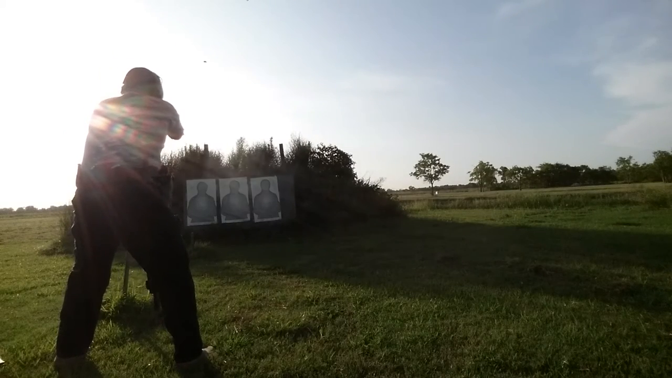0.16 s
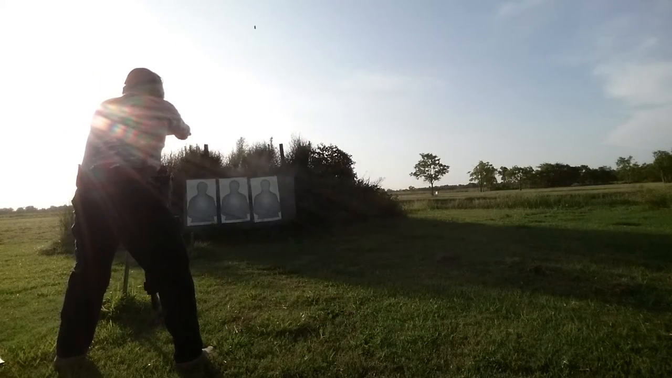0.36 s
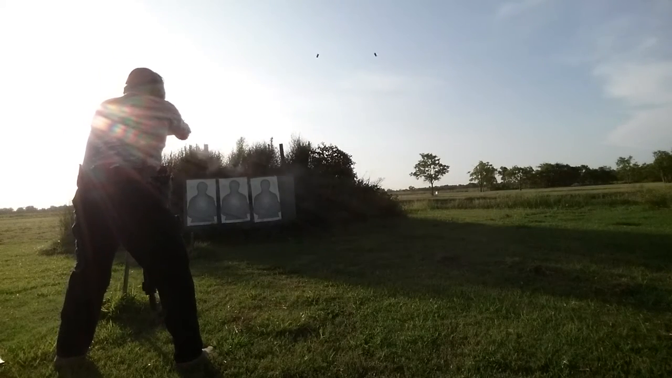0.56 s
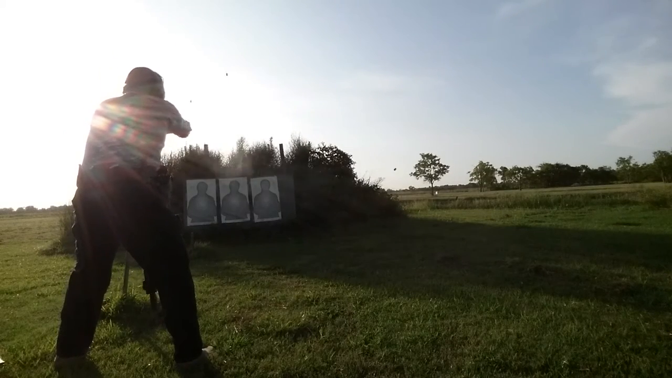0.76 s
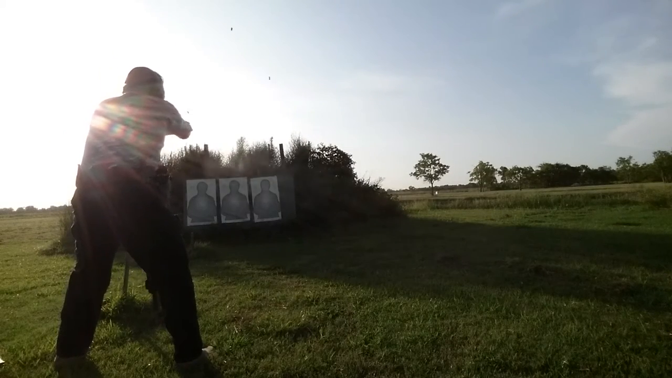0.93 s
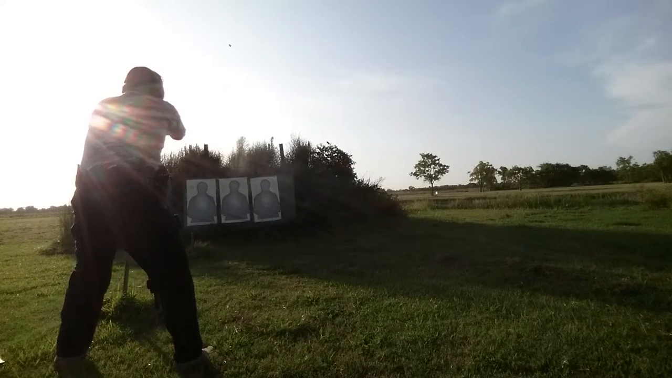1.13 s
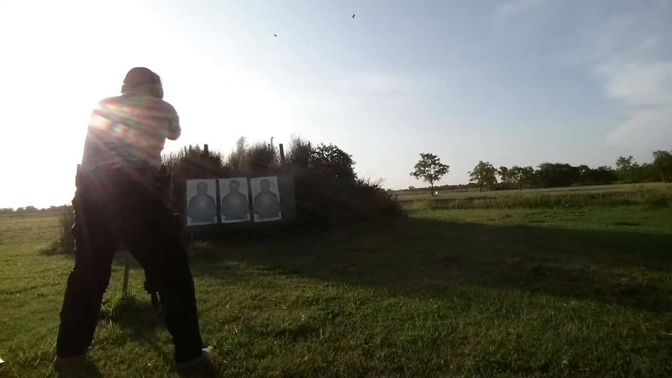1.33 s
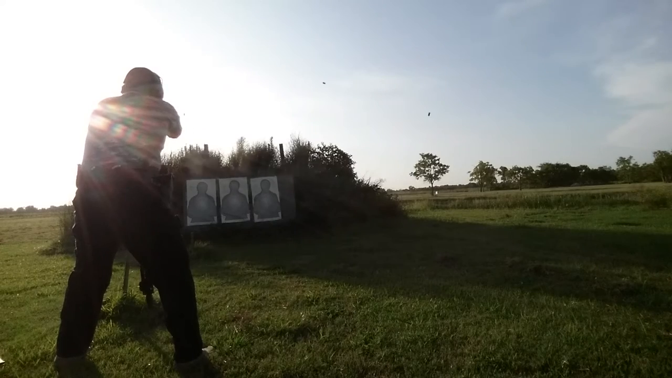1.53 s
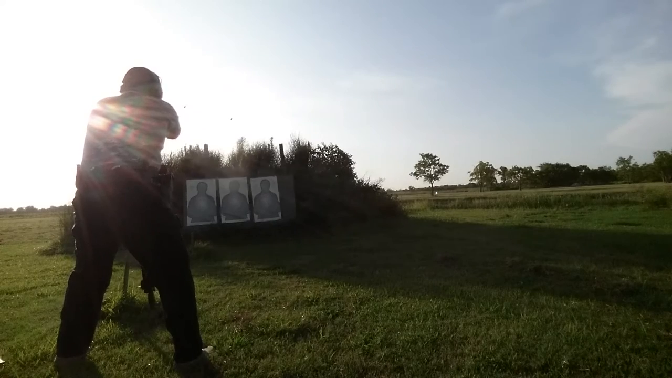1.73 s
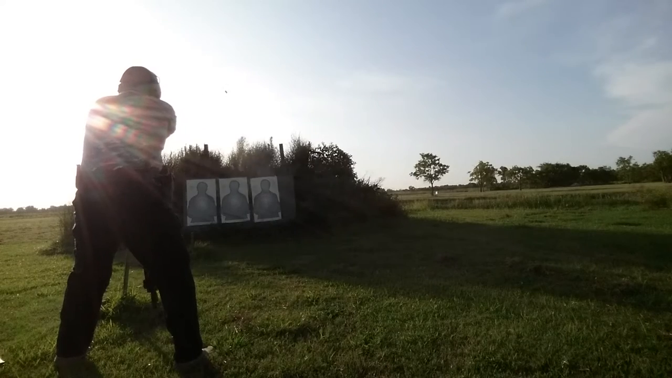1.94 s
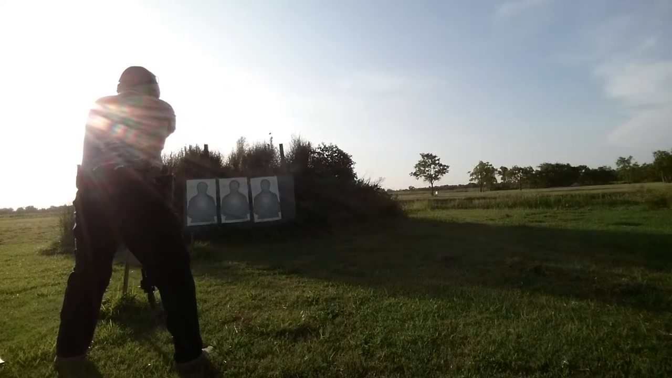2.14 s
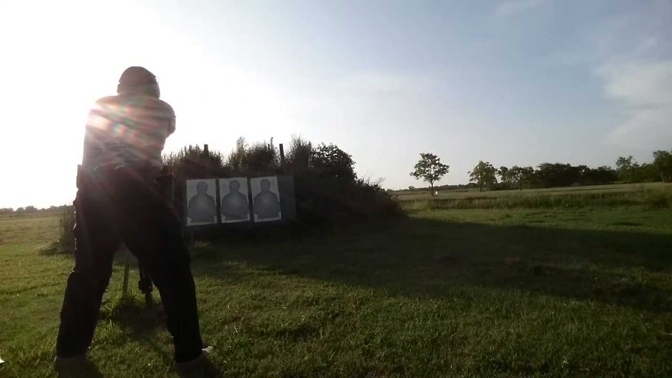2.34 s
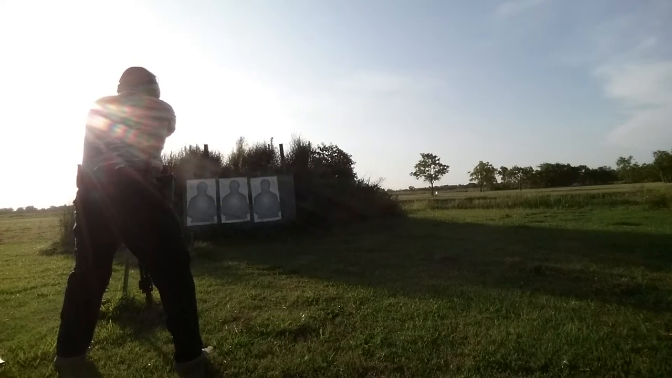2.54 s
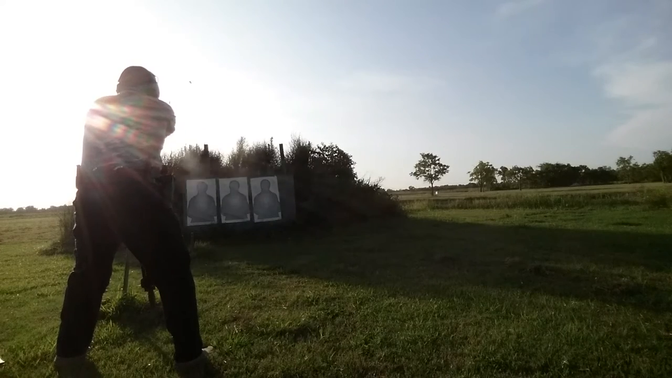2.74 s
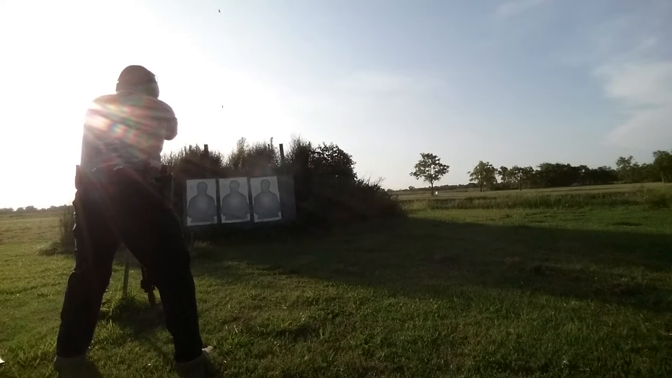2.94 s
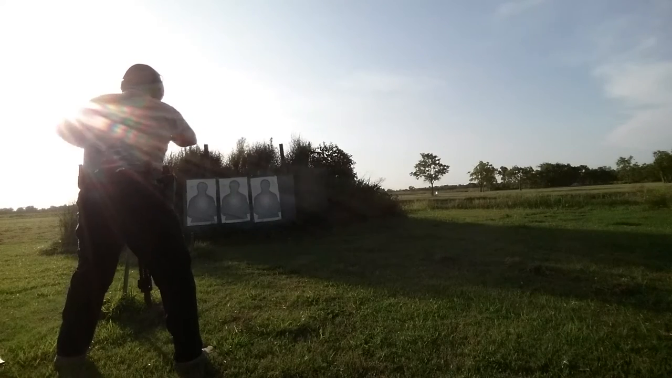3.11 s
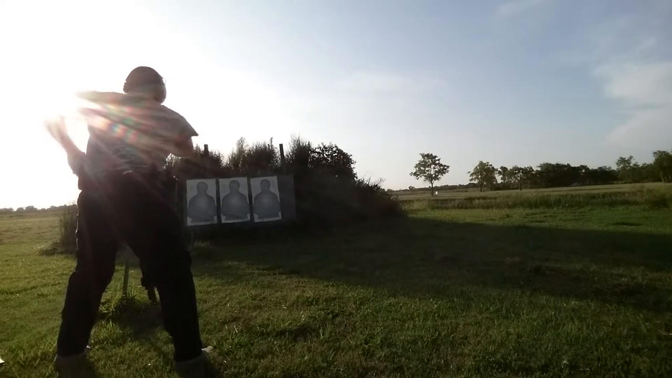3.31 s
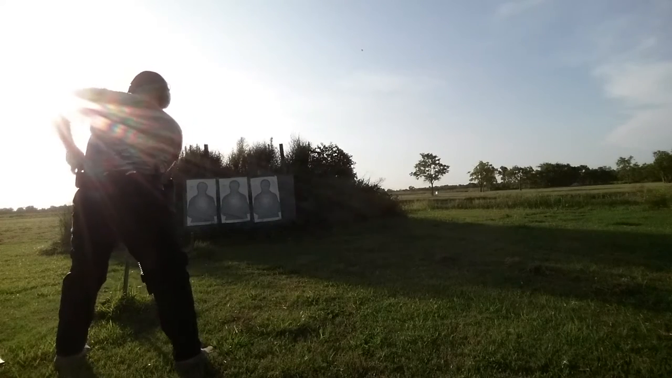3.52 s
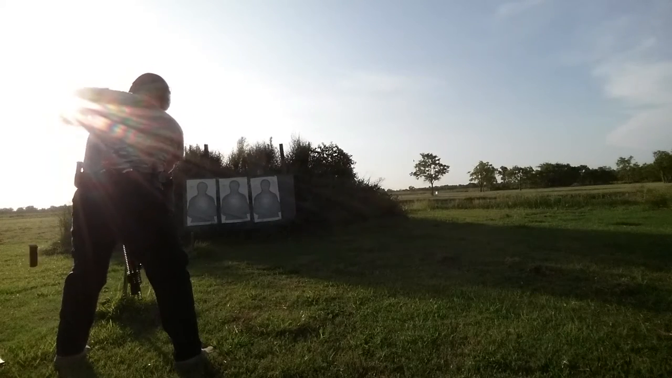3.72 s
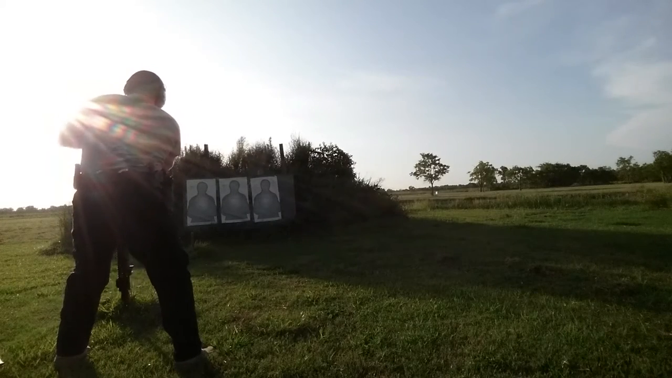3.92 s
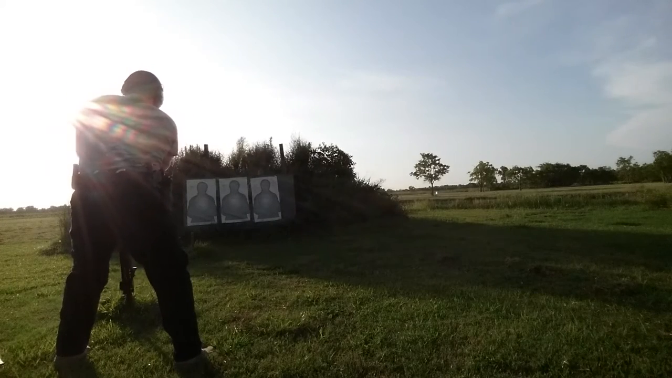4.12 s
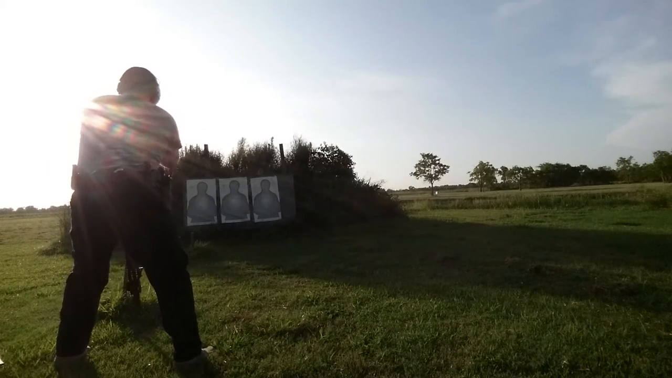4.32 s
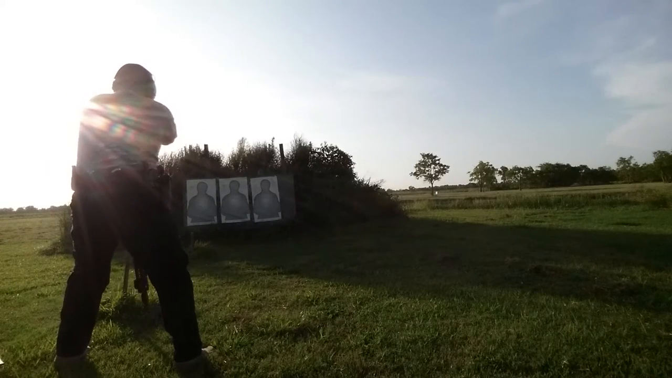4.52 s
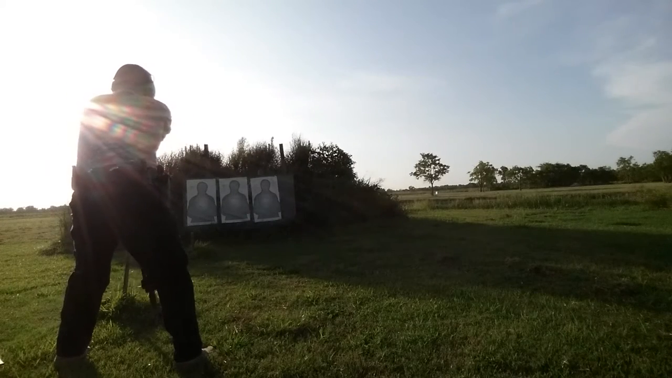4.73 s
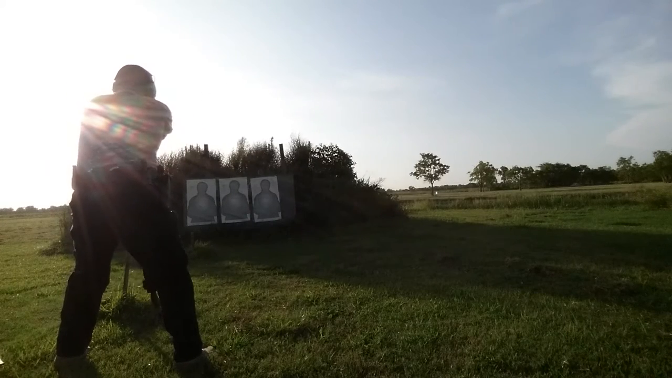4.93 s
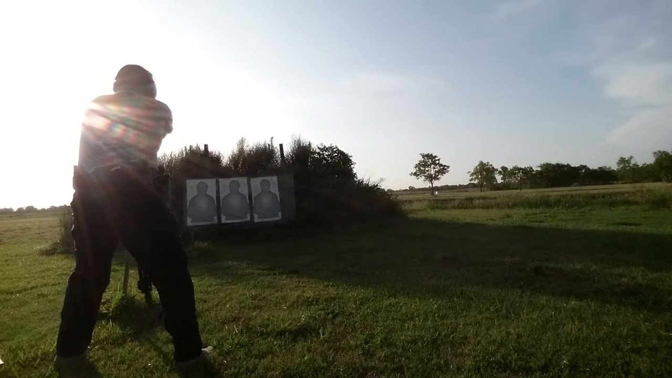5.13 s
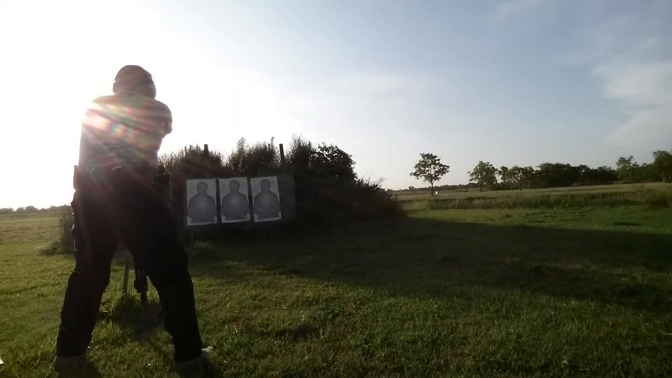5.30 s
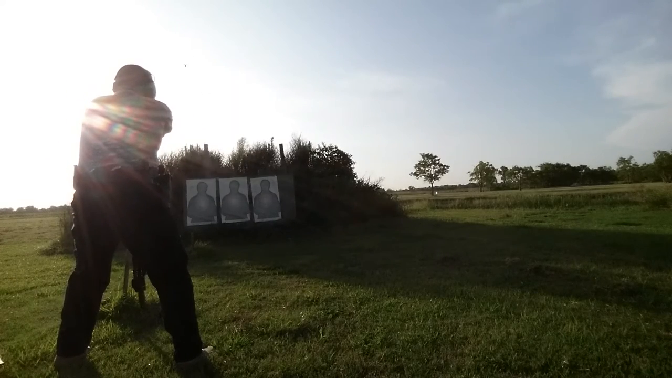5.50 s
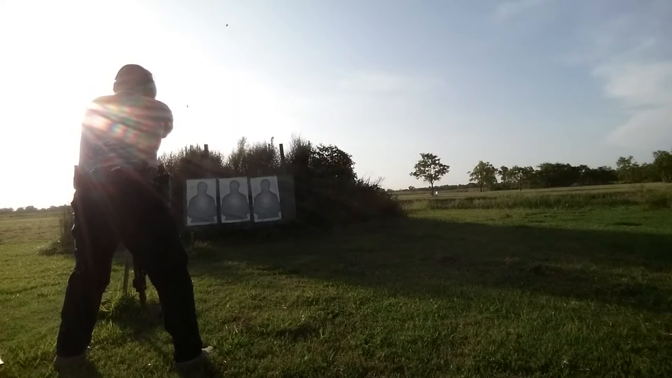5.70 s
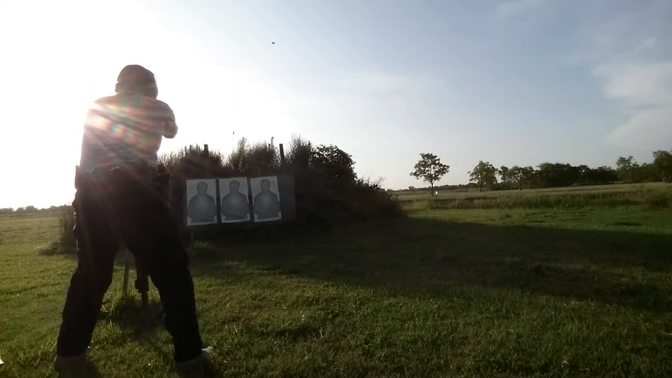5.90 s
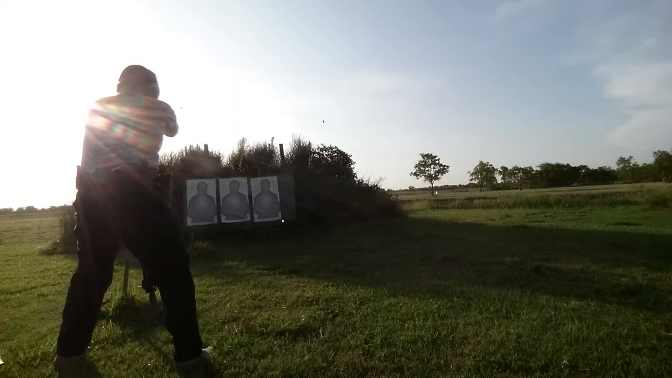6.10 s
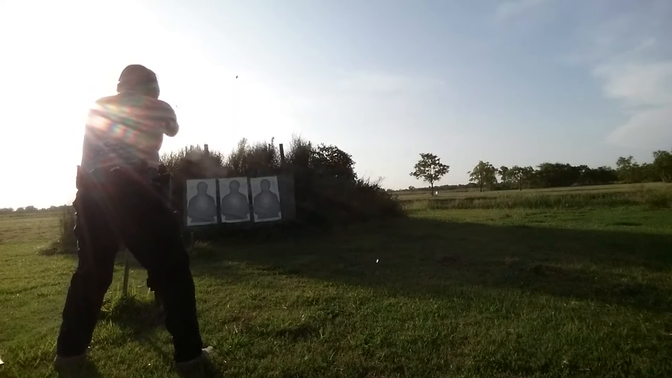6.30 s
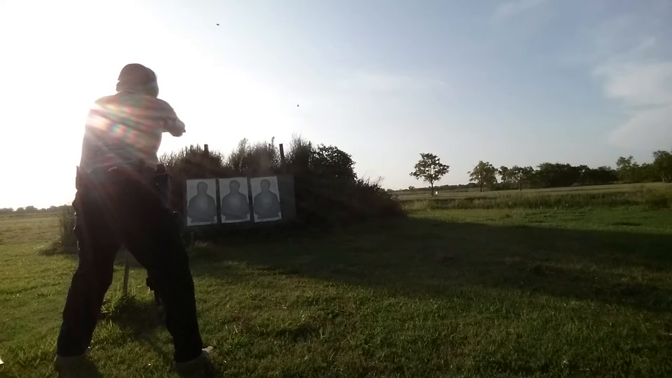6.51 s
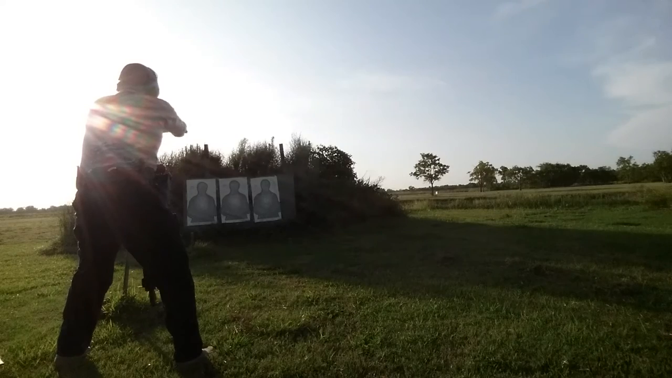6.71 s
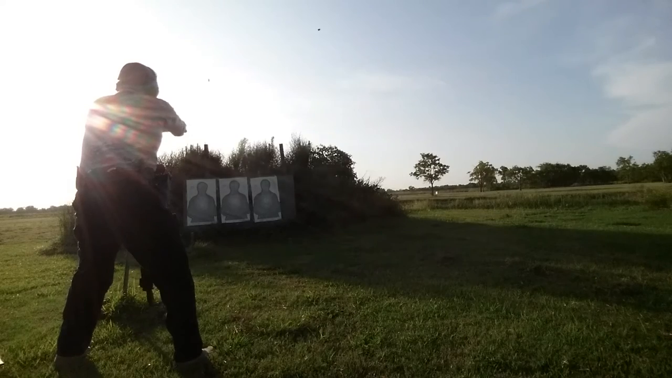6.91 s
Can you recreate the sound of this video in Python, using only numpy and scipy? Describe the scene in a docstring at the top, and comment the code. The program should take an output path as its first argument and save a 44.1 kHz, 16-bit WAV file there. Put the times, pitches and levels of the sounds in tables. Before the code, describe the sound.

Sharp rifle shots fire in quick strings on a windy outdoor range, pausing midway for a clacking magazine change.

```python
"""Quick strings of rifle shots crack across an open range, left of a small camera.
Each blast overloads the microphone, slaps back off the target boards, scatters from the earth bank
and rolls back from a far tree line. Gusts buffet the microphone ports throughout, over faint open air.
Midway the firing pauses for a magazine change: knocks, snaps, ringing steel and sliding friction.
A thin high hiss comes in with the pause and swells into the next string."""
import sys
import numpy as np
from scipy import signal
from scipy.fft import rfft, irfft
from scipy.io import wavfile
from scipy.ndimage import uniform_filter1d

SR = 44100
rng = np.random.default_rng(int(sys.argv[2]) if len(sys.argv) > 2 else 0)


def int16_out(signal):
    """Quantize to a 16-bit WAV file."""
    q = np.round(np.clip(np.atleast_2d(signal).T, -1, 1) * 32767)
    wavfile.write(sys.argv[1], SR, q.astype(np.int16))


N = 306495
TIME = np.arange(N) / SR
AGE = TIME[:int(1.8 * SR)]  # seconds since a shot or a contact
TOP_HZ = 15850  # the recorder's treble limit

# The shots, the first already dying away.
# Each row: start in seconds, level in dB, gas against that level in dB, slap level in dB.
SHOTS = [(-.06, 0, 1, 11), (0.1006, -0.5, 8, -2.5), (0.6537, 6, -4, -2), (0.8224, 5, 1.5, -1),
         (1.0047, 3.5, 6, -0.5), (1.584, 3, -1, -2), (1.7714, 4.5, 1.5, 1), (2.6227, 4, -10.5, -5.5),
         (2.8118, 4.5, -1, -3.5), (5.4632, 3.5, 0, -6.5), (5.6626, 1.5, 3, -0.5), (6.1607, 4, 0, -3.5),
         (6.3744, 6.5, -1.5, -2), (6.8187, 1, 5, 1)]
# Tone of the gas roar and its crack off the boards. Each row: frequency in Hz, relative level in dB.
BLAST_TONE = [(60, -6.5), (170, 6), (400, 6), (850, -2.5), (1300, -4), (2100, -6), (3500, -13),
              (6000, -20.5), (8300, -23.5), (10500, -11), (12700, -6.5), (15800, -13)]


def undb(db):
    """Decibels to gain."""
    return 10 ** (np.asarray(db) / 20)


def pan(db):
    """Left and right gains for a level difference, left minus right."""
    return undb(np.array([[db], [-db]]).reshape(2, -1) / 2)


def colour(x, points, size=4096):
    """Causal filter through (Hz, dB) points that keeps the power of white noise."""
    hz, db = np.transpose(points)
    f = np.maximum(np.fft.rfftfreq(size, 1 / SR), 1)
    gain = undb(np.interp(np.log(f), np.log(hz), db)) / np.sqrt(1 + (f / TOP_HZ) ** 40)
    cepstrum = irfft(np.log(gain / np.sqrt(np.mean(gain ** 2))))
    cepstrum[1:size // 2] *= 2  # minimum phase keeps attacks sharp
    cepstrum[size // 2 + 1:] = 0
    impulse = irfft(np.exp(rfft(cepstrum)))
    return signal.fftconvolve(x, impulse[None], axes=1)[:, :x.shape[1]]


def lowpass(x, hz):
    """Gentle two-pole low-pass."""
    return signal.sosfilt(signal.butter(2, hz, fs=SR, output="sos"), x)


def noise(count, alike=0.):
    """Stereo noise with the share `alike` of its power common to both ports."""
    apart = rng.standard_normal((2, count))
    return np.sqrt(1 - alike) * apart + np.sqrt(alike) * rng.standard_normal(count)


def blend(same, fresh, steady):
    """Mix a part that repeats on every shot, the share `steady` of the power, with a fresh part."""
    return np.sqrt(steady) * same + np.sqrt(1 - steady) * fresh


def add(out, start, x):
    """Mix a sound in at a start time in seconds."""
    i = int(round(start * SR))
    x, i = x[:, max(-i, 0):], max(i, 0)
    out[:, i:i + x.shape[1]] += x[:, :max(N - i, 0)]


def burst(t, rise, hold, decay):
    """Envelope that rises, holds until `hold` seconds and dies exponentially."""
    return np.clip(t / rise, 0, 1) * np.exp(-np.maximum(t - hold, 0) / decay)


def ringing(modes, t):
    """Struck modes (Hz, t60 s, dB) dying away."""
    return sum(undb(db) * np.sin(2 * np.pi * hz * t) * np.exp(-np.log(1000) * t / t60)
               for hz, t60, db in modes)


def shock(t, length):
    """Blast wave: a pressure jump that falls through zero into a longer suction."""
    u = np.maximum(t, 0) / length
    return (t > 0) * (1 - u) * np.exp(-u)


def muzzle(jet, gas_db):
    """The shock and its ground bounce ring the camera; gas roars for milliseconds and sizzles on."""
    # The camera's ring. Each row: frequency in Hz, t60 in seconds, level in dB.
    camera_modes = [(191, 0.059, -14.5), (325, 0.061, -26), (450, 0.012, -28), (694, 0.021, -15),
                    (936, 0.014, -19), (2070, 0.026, -34)]
    # Bright fizz trailing the blast. Each row: frequency in Hz, relative level in dB.
    sizzle_tone = [(300, -35.5), (2500, -24.5), (6000, -25), (8500, -20), (10500, -4.5), (12800, 1.5),
                   (15800, -5)]
    bounce_s = .0023
    t = AGE[:jet.shape[1]]
    at_ports = t - np.array([[.0001], [0]])  # the shock meets the left port a hair later
    length = 0.001 * np.exp(0.087 * rng.standard_normal())
    wave = undb(-2) * shock(at_ports, length) + undb(5.5) * shock(at_ports - bounce_s, length * 0.83)
    roar = colour(jet * burst(t, rise=0.0021, hold=0.0044, decay=.0032), BLAST_TONE)
    sizzle = colour(noise(len(t)) * burst(t, rise=0.00013, hold=0.0037, decay=0.01), sizzle_tone)
    gas = undb(-10) * roar + undb(-18) * sizzle
    return ringing(camera_modes, t) - lowpass(wave, 1200) + undb(gas_db) * gas


def scatterers(alike, lumpy_db, grain_s=.003):
    """Countless small reflections, clumped into stronger and weaker patches."""
    knots = np.arange(0, AGE[-1], grain_s)
    patches = undb(lumpy_db * np.interp(AGE, knots, rng.standard_normal(len(knots))))
    return noise(len(AGE), alike) * patches / np.sqrt(np.mean(patches ** 2))


def echo_envelope(echoes):
    """Strength against delay of broad echoes that each rise, hold and die."""
    return np.sqrt(sum((undb(db) * burst(AGE - delay, rise, hold, decay)) ** 2
                       for delay, rise, hold, decay, db in echoes))


def earth_bank():
    """The bank scatters every shot along the same paths; moving air reshuffles a part of them."""
    # Echoes of grass, bank and scrub. Each row: delay, rise, hold and decay in seconds, level in dB.
    echoes = [(.003, 0.0012, 0.0025, 0.009, -25), (.014, 0.0034, 0.02, 0.017, -30),
              (.034, .004, 0.042, .011, -24), (.08, .02, 0.0091, 0.021, -31)]
    # Tone of the scatter. Each row: frequency in Hz, relative level in dB.
    bank_tone = [(60, -5.5), (190, 5), (450, -0.5), (850, -2), (1350, -5), (2100, -8.5), (3400, -12.5),
                 (4700, -16), (6300, -19.5), (8300, -21), (10500, -2.5), (12700, 0), (15800, -7)]
    out, envelope = np.zeros((2, N)), echo_envelope(echoes)
    paths = scatterers(alike=.1, lumpy_db=4.5, grain_s=.0015)
    for start, db, gas_db, _ in SHOTS:
        scatter = blend(paths, scatterers(alike=.1, lumpy_db=4), steady=.45)
        add(out, start, undb((db + gas_db) / 2) * envelope * scatter)
    return colour(out, bank_tone) * pan(-.3)


def board_slap(count):
    """The target boards return the blast: a crack, then a heavy thump."""
    thump_hz, thump_lag_s, thump_decay_s = 205, 0.0019, 0.0025
    t = AGE[:count]
    length = 0.00088 * np.exp(0.18 * rng.standard_normal())
    wave = lowpass(shock(t, length), 420)
    late = np.maximum(t - thump_lag_s, 0)
    thump = np.sin(2 * np.pi * thump_hz * late) * np.exp(-late / thump_decay_s)
    crack = noise(count, alike=0.05) * burst(t, rise=0.00039, hold=0.0029, decay=0.0031)
    return (undb(-2) * thump - undb(2) * wave) * pan(-2.5) + undb(-2) * colour(crack, BLAST_TONE)


def trunks_and_posts():
    """Lone trunks and posts each send back a short rough copy, duller from some than from others."""
    # Each row: delay in seconds, level in dB, left minus right in dB, treble edge in Hz.
    reflectors = [(0.0577, -20.5, 1, 3058), (.066, -17.5, 0.5, 2482), (0.076, -21.5, -0.5, 2530),
                  (0.119, -38.5, -1.5, 5004), (0.216, -31, -2.5, 3000), (0.246, -30.5, 4.5, 3932),
                  (0.272, -28, 4.5, 14100), (0.363, -35, 5.5, 2859), (0.417, -33, 4.5, 3080)]
    out = np.zeros((2, len(AGE)))
    for delay, db, pan_db, edge_hz in reflectors:
        copy = noise(len(AGE), alike=0.058) * burst(AGE - delay, rise=0.00012, hold=0.001, decay=0.001)
        out += undb(db) * pan(pan_db) * lowpass(copy, edge_hz)
    return out


def tree_line():
    """Each shot rolls back from the far trees; air takes the treble from the longer paths."""
    # Echoes of field, tree line and woods. Each row: delay, rise, hold and decay in seconds, level in dB.
    echoes = [(.05, 0.055, 0.059, 0.089, -61), (.197, 0.016, 0.11, 0.14, -45), (.53, .08, .09, .22, -69)]
    # Tone of the roll. Each row: frequency in Hz, relative level in dB.
    tree_tone = [(80, -2.5), (400, -7), (1000, -3), (1400, -3.5), (2300, -2.5), (3400, -7), (4700, -10.5),
                 (8000, -24), (11000, -3.5), (13000, -9.5), (15800, -16.5)]
    follow = 0.13  # dB of far echo gained per dB of muzzle gas
    out, envelope = np.zeros((2, N)), echo_envelope(echoes)
    lone_echoes = trunks_and_posts()
    paths = scatterers(alike=.14, lumpy_db=3.5, grain_s=.005)
    bright = np.exp(-np.maximum(AGE - .28, 0) / 0.19)
    for start, db, gas_db, _ in SHOTS:
        scatter = blend(paths, scatterers(alike=.1, lumpy_db=3.5), steady=0.23)
        roll = lone_echoes + envelope * scatter
        darkening_roll = bright * roll + (1 - bright) * lowpass(roll, 2900)
        add(out, start, undb(follow * (db + gas_db)) * darkening_roll)
    return colour(out, tree_tone) * pan(-5)


def shade(x):
    """The port on the shooter's side hears more treble, the other more boom."""
    # Each row: frequency in Hz, left minus right in dB.
    balance = [(100, -4.5), (300, -3), (800, -9), (1400, -1.5), (2200, 1), (4500, 8.5), (8000, -1),
               (13000, 4.5)]
    hz, db = np.transpose(balance)
    f = np.maximum(np.fft.rfftfreq(N, 1 / SR), 1)
    return irfft(rfft(x) * pan(np.interp(np.log(f), np.log(hz), db)), N)


def housing(x):
    """The camera's housing adds narrow resonances to the gunfire."""
    # Each row: frequency in Hz, width in Hz, level in dB.
    resonances = [(709, 54, -8.5), (932, 52, -6.5), (1530, 23, -17), (1870, 270, -2.5), (2174, 17, -6.5),
                  (2540, 200, -7), (2965, 37, -12.5)]
    return x + sum(undb(db) * signal.lfilter(*signal.iirpeak(hz, hz / width, fs=SR), x)
                   for hz, width, db in resonances)


def rifle(count=4000):
    """Every muzzle blast with its slap, the bank's scatter and the roll from the trees."""
    slap_delay_s = .0332
    near = np.zeros((2, N))
    common_jet = noise(count, alike=0.055)
    for start, db, gas_db, slap_db in SHOTS:
        jet = blend(common_jet, noise(count, alike=.15), steady=.3)
        add(near, start, undb(db) * muzzle(jet, gas_db))
        add(near, start + slap_delay_s, undb(slap_db) * board_slap(count))
    return shade(near) + earth_bank() + tree_line()


def flutter(hz, depth_db):
    """Gain that wavers at random, mostly slower than `hz`."""
    wander = lowpass(noise(N), hz)
    return undb(depth_db * wander / wander.std())


def turbulence(tone, alike):
    """Coloured stereo noise of even strength."""
    x = colour(noise(N, alike), tone)
    return x / np.sqrt(uniform_filter1d(x ** 2, 1500, axis=1) + 1e-9)


def wind():
    """Breeze and buffets rumble on the right port and shed fluttering eddies; the left is in the lee."""
    # The breeze on the windward port. Each row: time in seconds, level in dB.
    breeze = [(0, -40.5), (0.4, -43), (0.6, -44), (1.2, -39), (1.9, -33), (2.45, -45.5), (2.95, -37.5),
              (3.45, -57.5), (3.8, -60), (4.15, -41.5), (4.42, -54), (4.85, -40), (5.4, -36.5), (5.9, -41),
              (6.6, -50), (6.95, -61)]
    # Each row: peak time in seconds, length in seconds, rumble in dB, eddies against rumble in dB.
    buffets = [(0.308, 0.024, -36, -4), (0.502, 0.059, -28.0, 0.5), (0.582, 0.15, -34, 4.5),
               (0.759, 0.14, -33, -2.0), (0.997, 0.16, -42.5, 4), (1.356, 0.029, -41, 6),
               (1.441, 0.058, -27, 0), (1.55, 0.083, -33, 5), (1.72, 0.054, -32.5, 0),
               (1.9, 0.057, -30.5, 3.5), (1.982, 0.06, -23.5, -9), (2.108, 0.055, -29, -9),
               (2.228, 0.049, -29, 0), (2.384, 0.034, -31.5, -0.5), (2.544, 0.058, -29, -3),
               (2.964, 0.024, -39.5, 1.5), (3.107, 0.18, -41, -4), (3.295, 0.017, -38, -4),
               (3.392, 0.079, -38, -14), (3.574, 0.023, -39, -13.5), (4.03, 0.036, -32.5, -10),
               (4.142, 0.062, -30.5, -16), (4.242, 0.067, -33, -14), (4.575, 0.026, -25, -9.5),
               (4.657, 0.074, -31.5, -15), (5.032, 0.027, -22.5, -18), (5.296, 0.04, -20.5, -10.5),
               (5.365, 0.076, -24.0, -15), (5.405, 0.0091, -25, -3), (5.476, 0.017, -13.5, -11),
               (5.805, 0.063, -44, 3), (6.134, 0.09, -38.5, -9), (6.706, 0.048, -43, -6)]
    # Tones of the deep rumble and the smaller eddies. Each row: frequency in Hz, relative level in dB.
    rumble_tone = [(20, -17), (40, -5.5), (65, 3), (100, 2), (150, -8), (250, -34.5), (500, -52.5),
                   (1500, -78.5), (6000, -110)]
    eddy_tone = [(60, -14.5), (130, 0.5), (190, 0), (280, -12), (420, -21.5), (800, -44), (2500, -69),
                 (7000, -105)]
    breeze_eddy_db, lee_db, lee_follow = -9.5, -28, .63
    power = undb(np.interp(TIME, *np.transpose(breeze))) ** 2
    eddy_power = power * undb(breeze_eddy_db) ** 2
    for peak, length, db, eddy_db in buffets:
        buffet = undb(db) ** 2 * np.exp(-(2 * (TIME - peak) / length) ** 2)
        power += buffet
        eddy_power += buffet * undb(eddy_db) ** 2
    eddy_gain = flutter(hz=20, depth_db=2.5) * np.sqrt(eddy_power / power)
    rumble = undb(1.26) * turbulence(rumble_tone, alike=0.13)
    eddies = undb(0.2) * turbulence(eddy_tone, alike=0) * eddy_gain
    right_db = 10 * np.log10(power)
    left_db = lee_db + lee_follow * right_db
    return (rumble + eddies) * undb([left_db, right_db])


def open_air():
    """Faint open air, joined in the pause by a thin high hiss; both swell into the next string."""
    # Tones of the air and the hiss. Each row: frequency in Hz, relative level in dB.
    air_tone = [(240, -3), (450, 4), (800, 3.5), (1600, -2.5), (2100, -6.5), (4000, -15.5), (8000, -28),
                (11000, -19.5), (15800, -23)]
    hiss_tone = [(3000, -28), (7000, -22), (9300, -30), (10400, 4.5), (11000, 2), (11700, -6), (13000, -1),
                 (15200, 0.5), (15800, 4)]
    hiss_start_s, hiss_end_s, swell_start_s, swell_rise_s = 3.96, 6, 4.95, 0.69
    hiss_gate = burst(TIME - hiss_start_s, rise=.05, hold=hiss_end_s - hiss_start_s, decay=.05)
    swell = hiss_gate * np.clip((TIME - swell_start_s) / swell_rise_s, 0, 1)
    air = (undb(-76.5) + undb(-70.5) * swell) * colour(noise(N, alike=.2), air_tone)
    hiss = (undb(-74.5) * hiss_gate + undb(-68.5) * swell) * colour(noise(N), hiss_tone)
    return air + hiss


def magazine_change(count=26000):
    """Each contact knocks the rifle's hollow body, snaps and rings its steel; ground and trees answer."""
    # Each row: start in seconds, then dull knock, snap, steel ring and left minus right, all in dB.
    contacts = [(3.948, -27.5, -36, -66, 0.5), (3.974, -28, -32.5, -65, -1), (4.118, -64, -68, -60.5, 2.5),
                (4.226, -39, -39.5, -62, -2.5), (4.264, -60, -39, -54, 8), (4.282, -56, -31.5, -46, 2),
                (4.293, -46, -23, -42, 1.5), (4.328, -63, -33, -52, 0)]
    # Modes of the hollow body and the steel. Each row: frequency in Hz, t60 in seconds, level in dB.
    body_modes = [(359, 0.026, -3.5), (578, 0.028, 5), (764, 0.016, -20), (1247, 0.092, -10.5),
                  (2260, 0.0084, -39)]
    steel_modes = [(3300, .04, -7), (5680, .12, -14), (13100, .17, -5), (14400, 0.25, 3), (15100, .1, -11)]
    # Tones of the knock and the snap. Each row: frequency in Hz, relative level in dB.
    knock_tone = [(100, -12), (350, 10.5), (600, 9), (1200, -4.5), (1700, -31), (2400, -15.5), (5000, -44),
                  (9000, -44)]
    snap_tone = [(300, -29), (2200, -7.5), (5000, -15.5), (8000, -21), (10500, -6), (13000, 8.5),
                 (15800, -6)]
    out, t = np.zeros((2, N)), AGE[:count]
    body = ringing(body_modes, t)
    thud = burst(t, rise=0.00026, hold=0.00072, decay=0.0016) + undb(-25) * np.exp(-t / 0.033)
    ground_tail = undb(-22.5) * burst(t, rise=.005, hold=0.036, decay=0.035)
    tree_tail = undb(-47) * burst(t - .2, rise=.02, hold=0.0474, decay=.08)
    click = burst(t, rise=0.00018, hold=0.0012, decay=0.0053) + ground_tail + tree_tail
    for start, knock_db, snap_db, ring_db, pan_db in contacts:
        knock = undb(4) * colour(noise(count, alike=0.7) * thud, knock_tone) + undb(-8.5) * body
        snap = colour(noise(count, alike=0.1) * click, snap_tone)
        ring = ringing(steel_modes, t + 0.0015 * rng.random((2, 1)))  # its own phase at each port
        contact = undb(knock_db) * knock + undb(snap_db) * snap + undb(ring_db) * ring
        add(out, start, contact * pan(pan_db))
    return out


def rubbing():
    """Hand and magazine slide along the rifle with short, grainy friction."""
    # Each row: start in seconds, length in seconds, level in dB.
    slides = [(4.012, .045, -64), (4.15, 0.096, -68)]
    # Tone of the friction. Each row: frequency in Hz, relative level in dB.
    rub_tone = [(400, 0), (1500, 1), (3200, -10), (7000, -25), (11000, 0), (14000, -3), (15800, -7)]
    grain = flutter(hz=150, depth_db=3)
    pressure = sum(undb(db) * burst(TIME - start, rise=.01, hold=length, decay=0.02)
                   for start, length, db in slides)
    return colour(noise(N) * grain * pressure, rub_tone)


def scene():
    """Gunfire, wind, open air and the magazine change, as they reach the microphone."""
    return undb(-2.5) * housing(rifle()) + wind() + open_air() + magazine_change() + rubbing()


def record(dry):
    """The microphone drops the deepest bass and saturates on the blasts; the recorder cuts the top."""
    low_hz, ceiling = 28, .86
    trimmed = signal.sosfilt(signal.butter(2, low_hz, "high", fs=SR, output="sos"), dry)
    saturated = ceiling * np.tanh(trimmed / ceiling)
    return signal.sosfiltfilt(signal.ellip(8, .1, 50, TOP_HZ, fs=SR, output="sos"), saturated)


dry = scene()
out = record(dry)
int16_out(out)
```